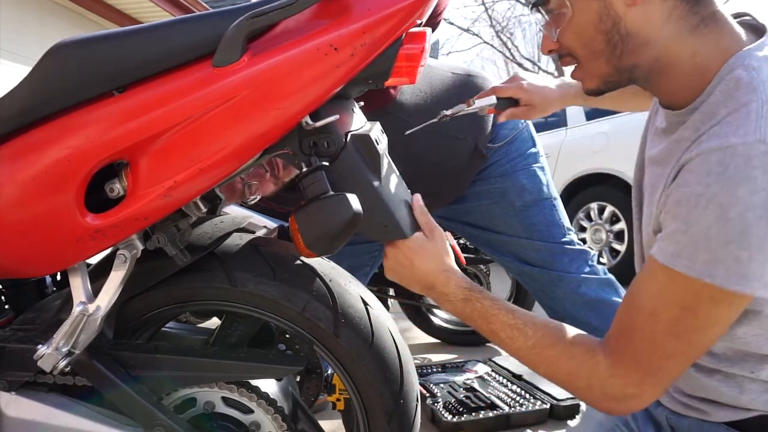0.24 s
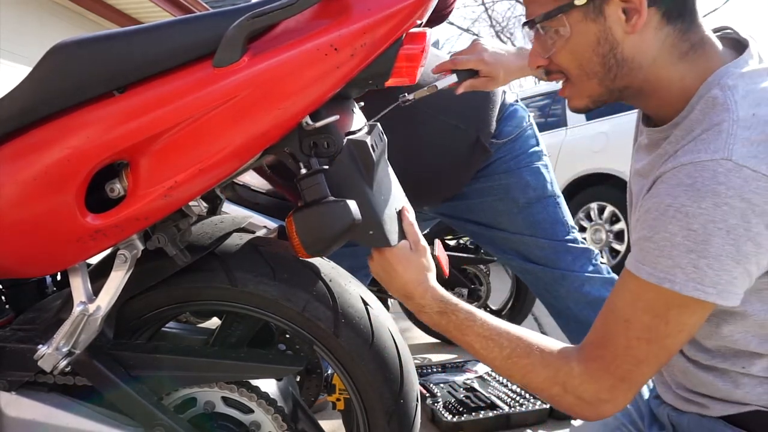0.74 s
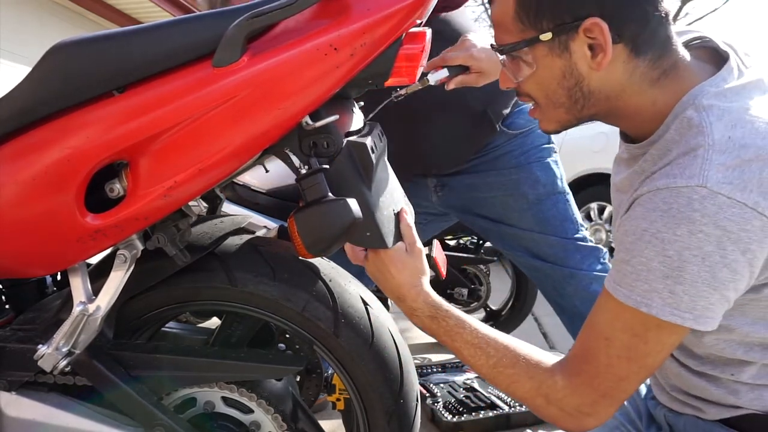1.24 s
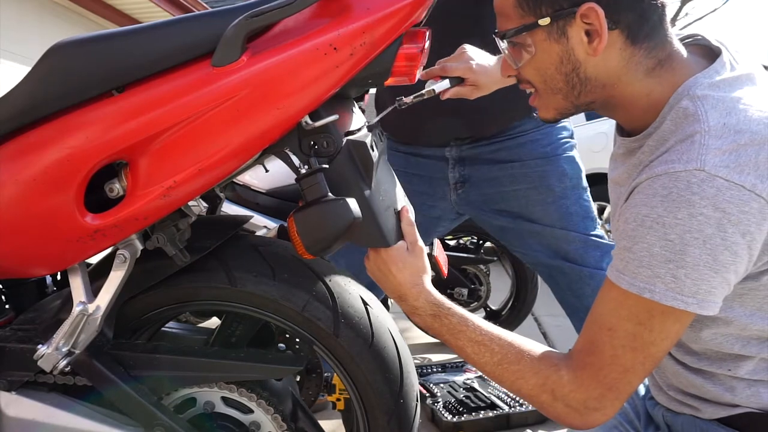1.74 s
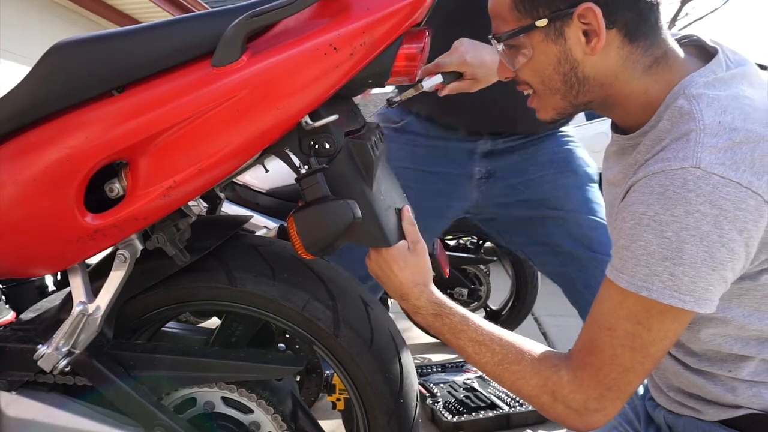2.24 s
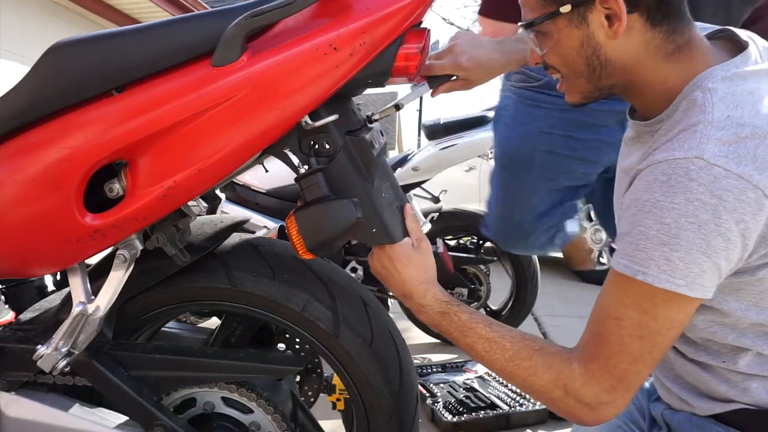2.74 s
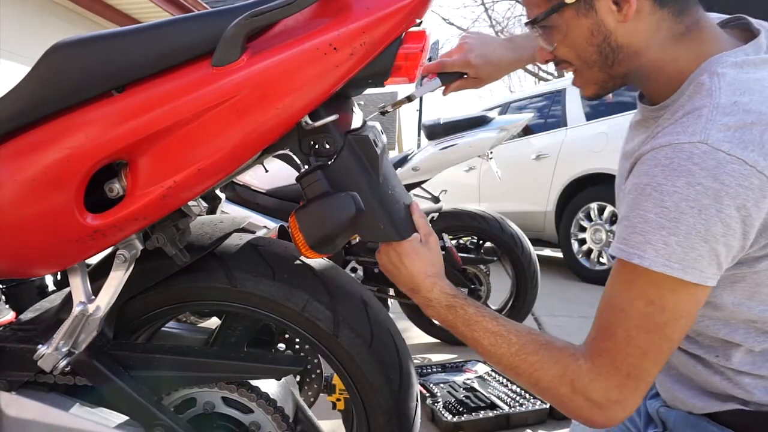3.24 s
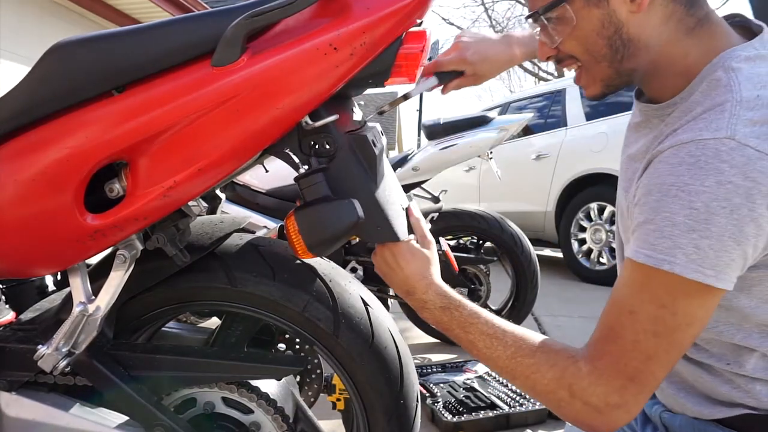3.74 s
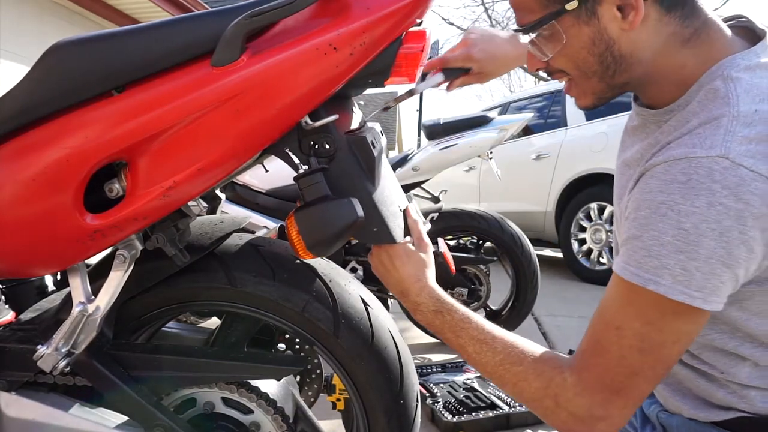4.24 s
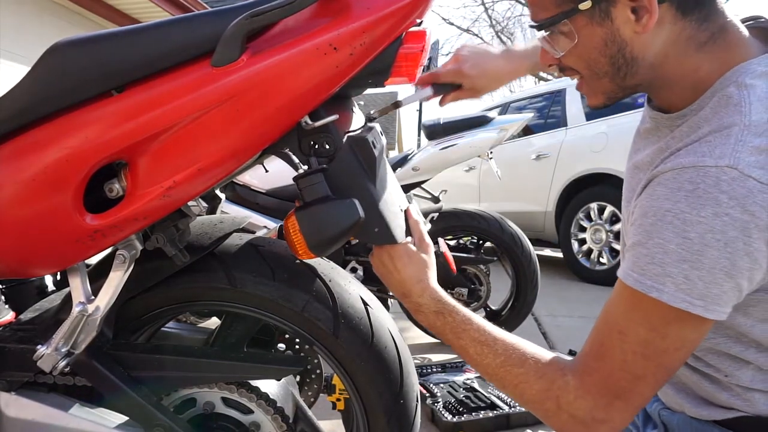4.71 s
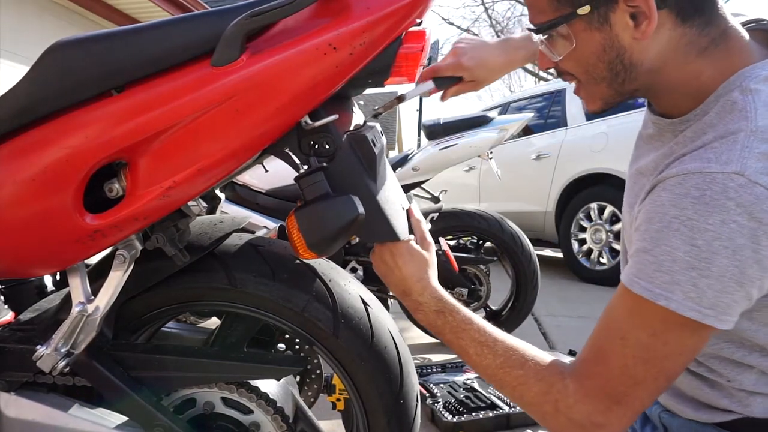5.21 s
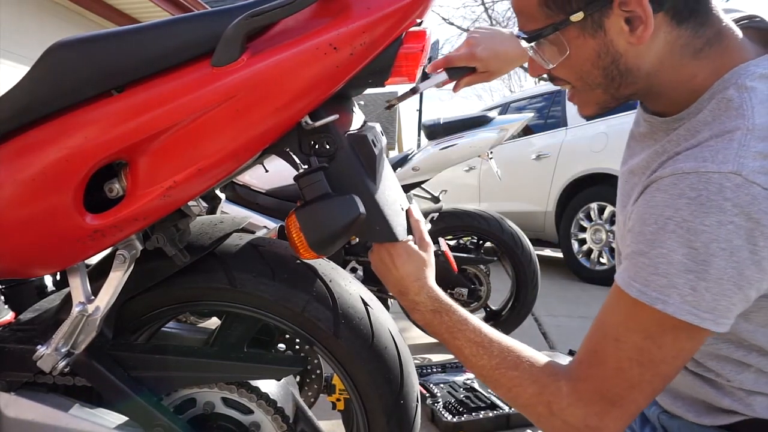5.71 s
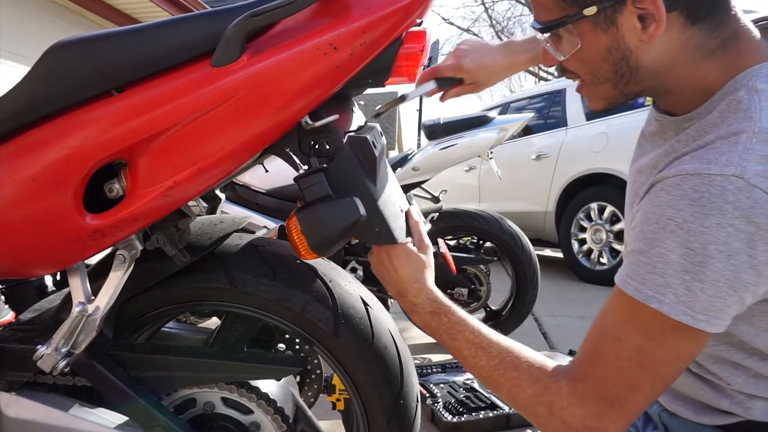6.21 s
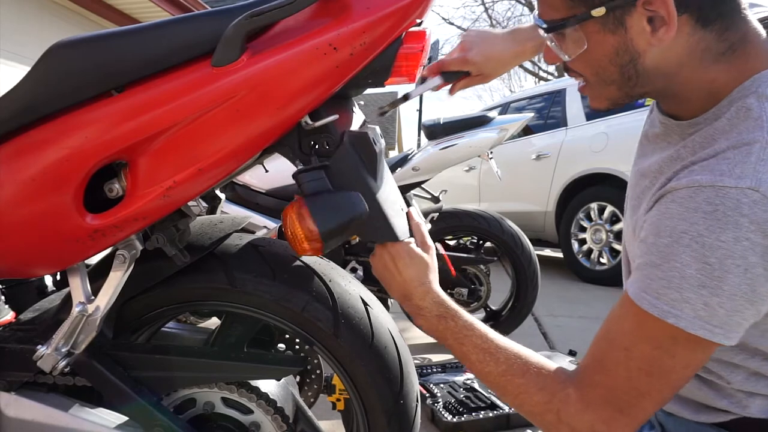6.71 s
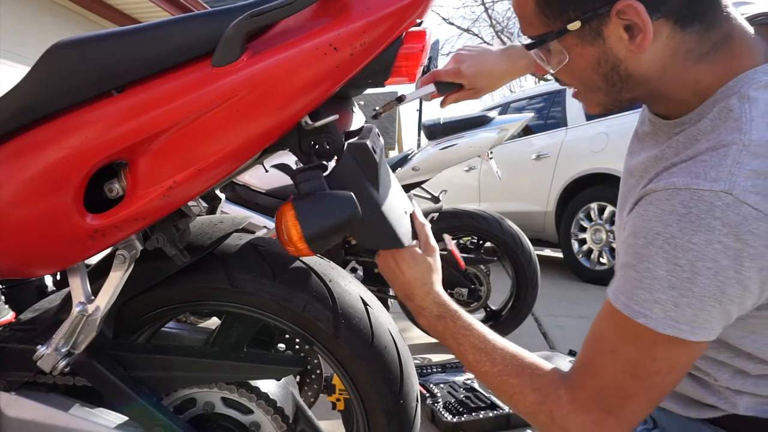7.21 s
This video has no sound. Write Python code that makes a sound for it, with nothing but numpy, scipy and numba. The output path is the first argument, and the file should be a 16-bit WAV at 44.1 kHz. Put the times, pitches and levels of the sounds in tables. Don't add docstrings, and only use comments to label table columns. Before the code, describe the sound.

Wind buffets a close microphone in a driveway while a fine blade is set against thin plastic fins, ticking, snagging and scraping irregularly. Then the hand saws at a brisk, even pace: strong push, weaker pull, nearly five full cycles each second. Each stroke is a short gritty zip ringing the hollow plastic, with bright metallic hiss and occasional tooth clicks. Distant traffic murmurs very quietly beneath, and the strokes continue to the end.

```python
import sys
import numpy as np
from scipy import signal
from scipy.fft import rfft, irfft, next_fast_len
from scipy.io import wavfile
from scipy.ndimage import uniform_filter1d
from numba import njit

SR = 44100
rng = np.random.default_rng(int(sys.argv[2]) if len(sys.argv) > 2 else 0)


def volts_from_db(level):
    exponent = np.asarray(level, float) / 20
    return 10 ** exponent


def persist_wave(psi):
    counts = np.round(np.clip(psi, -1, 1) * 32767).astype(np.int16)
    wavfile.write(sys.argv[1], SR, np.atleast_2d(counts).T)


N = 328985

# (start [s], length [s], body level [dB], fin level [dB], tooth rate [Hz])
PUSH_STROKES = [(3.42, 0.081, -29.5, -37, 423.2), (3.638, .08, -27, -34.5, 400.3),
                (3.838, 0.058, -29, -34, 400.2), (4.037, 0.076, -21.5, -29.5, 476),
                (4.254, 0.063, -20.5, -27, 475), (4.474, 0.063, -21.5, -30, 396),
                (4.698, .068, -22, -28.5, 437), (4.908, 0.077, -21.5, -29, 436.6),
                (5.129, 0.055, -19.5, -30.5, 442.8), (5.338, .08, -20.5, -29, 424),
                (5.56, 0.072, -18.5, -26.5, 403.3), (5.772, 0.07, -21, -29.5, 444.8),
                (5.992, 0.07, -20, -30, 521.4), (6.209, .086, -21.5, -27.5, 419.2),
                (6.417, 0.062, -19.5, -28, 406.9), (6.616, .07, -22.5, -26.5, 408.8),
                (6.808, 0.059, -21.5, -26, 410), (6.993, 0.055, -22, -27.5, 350.4),
                (7.194, 0.063, -27, -28.5, 534), (7.385, 0.059, -23.5, -28, 367.2)]
# (start [s], length [s], body level [dB], fin level [dB], tooth rate [Hz])
PULL_STROKES = [(3.536, 0.07, -34, -43, 371.4), (3.732, 0.089, -32, -38.5, 424),
                (3.943, 0.091, -33.5, -40.5, 399), (4.137, .12, -36, -35, 519),
                (4.376, .07, -39, -41, 423.8), (4.598, 0.058, -36.5, -39.5, 406),
                (4.812, 0.074, -29.5, -34, 465), (5.014, .085, -26.5, -33, 385),
                (5.244, .09, -36, -39, 460.8), (5.46, .11, -28, -35.5, 445.3),
                (5.662, 0.083, -29, -34.5, 382.4), (5.88, 0.1, -31.5, -33, 405.4),
                (6.113, .093, -32.5, -37.5, 444.7), (6.334, 0.069, -30.5, -40.5, 405),
                (6.517, .087, -30.5, -37, 505.5), (6.713, 0.09, -32.5, -40.5, 437.3),
                (6.899, 0.086, -29, -37, 410), (7.091, 0.099, -36, -36.5, 555.3),
                (7.272, 0.097, -30.5, -33.5, 455.2)]
# (start [s], length [s], body level [dB], fin minus body [dB], blade minus body [dB])
TRIAL_SCRAPES = [(.74, .05, -52, -9, -30), (0.879, .05, -61.5, -3, -22), (1.505, 0.088, -42, -9, -25.5),
                 (1.649, 0.033, -44.5, 6, -20), (1.693, 0.055, -60, -19, -22),
                 (1.824, 0.061, -44.5, -3, -15.5), (1.96, .06, -51, -21, -27),
                 (2.063, 0.087, -32.5, -9, -19.5), (2.188, 0.064, -36, -12, -44), (2.34, .05, -60, -4, -9),
                 (2.629, .029, -27.5, -13, -26.5), (2.657, 0.067, -30, -6.5, -19),
                 (2.737, .022, -27.5, -7, -26), (2.777, 0.061, -33, -10.5, -16.5),
                 (2.824, 0.047, -36, -9, -23), (3.302, 0.072, -39.5, -10.5, -30),
                 (3.357, 0.062, -42.5, -8, -18)]
# (time [s], hiss [dB], fin rustle [dB])
BLADE_DRAG = [
    (0., -84, -59),
    (.35, -87, -73),
    (.72, -83, -82),
    (.77, -77, -86),
    (1.4, -76, -72),
    (1.6, -74, -61.5),
    (2.4, -65, -63),
    (2.9, -72.5, -66.5),
    (3.28, -69.5, -60),
]
# (pitch [Hz], width [Hz], level [dB])
BODY_MODES = [(146, 33, -33), (230.4, 106, -14), (347, 86.3, -1), (385, 74.7, 0.5), (442, 85.6, -4.5),
              (555, 70.5, -2), (592.7, 78.4, -5), (724, 109, -13.5)]
# (pitch [Hz], width [Hz], level [dB])
FIN_MODES = [(851, 69, 0), (974, 63, 0.5), (1264, 283, -3.5), (1525, 84, 2.5), (1697, 260, -9),
             (2224, 266, -9), (2558, 304, -12), (3235, 226, -13), (3407, 550, -17.5)]
# (pitch [Hz], width [Hz], level [dB])
OUTER_FIN_MODES = [(710, 110, 4.5), (1080, 180, -3.5), (1820, 250, -4.5), (2150, 210, -5),
                   (2560, 200, -5.5), (4060, 510, -17)]
# (pitch [Hz], width [Hz], level [dB])
BLADE_MODES = [(4428, 380, -10), (5346, 130, 4.5), (5720, 660, 1), (7030, 1200, -9.5), (7417, 160, 2.5),
               (8340, 582, -6.5), (9000, 580, -9), (10030, 381, -4.5), (10640, 172, -6), (10963, 98.8, 5.5)]
# (frequency [Hz], level [dB per Hz])
FRICTION_HISS = [(1200, -29), (2500, 2.5), (4000, 0.5), (7000, -0.5), (11000, -9), (12000, -8)]
# (time [s], peak [dB], ring minus peak [dB])
TOOTH_CATCHES = [(3.4302, -15, -16), (3.642, -17, -8.5), (4.0986, -15, 1), (4.3828, -20, -25),
                 (4.4713, -22, -8), (4.6947, -14.5, -16), (4.7547, -15, 0.5), (4.9183, -24, 5),
                 (4.9758, -20, 4), (5.249, -20.5, -25), (5.427, -25, -1), (5.6266, -27, 2),
                 (5.7744, -27, 6), (6.0033, -17.5, 4.5), (6.2159, -16.5, -11), (6.4215, -19.5, 3.5),
                 (7.002, -19.5, 5.5), (7.412, -14, -10), (7.4514, -38, 4)]
# (time [s], peak [dB], thud minus peak [dB], ring minus peak [dB])
BLADE_TAPS = [(.1244, -44, -2, -23), (.286, -48, 0, -12), (.7529, -32.5, 13.5, -29), (.7744, -42, 17, -20),
              (.8653, -44, 6, -27), (.9036, -38, 4.5, -22), (1.5173, -29, 3.5, -18),
              (1.6574, -27.5, -2.5, -27), (1.714, -30, -4, -31), (1.8442, -25, -8, -22),
              (1.9887, -39.5, 5, -1.5), (2.0534, -30, 1, -16), (2.394, -31, 10, -23), (2.483, -39, -2, -11),
              (2.6382, -34, 9, -22), (2.743, -21.5, 14, -5), (2.9203, -35.5, -3, -37),
              (3.1832, -24.5, 3.5, -31)]
# (time [s], peak [dB], pitch [Hz])
WIND_SLAPS = [(0.017, -24.5, 181), (0.138, -32, 145), (0.231, -26.5, 194), (0.681, -28.5, 101),
              (0.725, -18, 172), (0.776, -22, 132), (0.856, -16.5, 145), (1.022, -20, 194),
              (1.089, -32, 113), (1.118, -21, 110), (1.219, -25.5, 140), (1.36, -31, 52),
              (2.969, -40, 57.1), (3.022, -28.5, 118), (3.089, -30.5, 69.9), (3.708, -24.5, 68),
              (3.878, -23, 256.4), (3.939, -22, 81), (4.059, -29, 91.5)]
# (crest time [s],
# level [dB], dying time [s])
GUSTS_AND_THUMPS = [(0.039, -38.5, 0.022), (.12, -37.5, 0.078), (.56, -54, 0.023), (0.731, -27.5, 0.067),
                    (.87, -46, 0.013), (1.04, -30.5, 0.083), (1.24, -48, .12), (3.03, -47, .08),
                    (3.49, -54, 0.044), (3.72, -40.5, 0.057), (3.82, -39, 0.14), (3.95, -33, 0.045),
                    (4.07, -40.5, .15), (5.36, -57, .04), (5.74, -51, .2), (6.05, -55, 0.052), (6.31, -46, .05),
                    (6.46, -44, .06), (6.69, -47, .03), (6.84, -43, .07), (7.25, -48, .12), (7.42, -47, 0.098)]
# (frequency [Hz], level [dB per Hz])
WIND_SPECTRUM = [(26, -50), (45, 0), (134, 2.5), (352, -9), (493, -28), (595, -45), (666, -55), (727, -35),
                 (900, -55), (1170, -58), (1980, -120)]
# (frequency [Hz], level [dB per Hz])
STREET_SPECTRUM = [(59, -8.5), (100, -6.5), (203, -10.5), (278, -13.5), (473, -8), (564, -11.5),
                   (887, -9.5), (2030, -33.5), (2370, -35.5), (3000, -42), (11000, -48), (14300, -78),
                   (22000, -120)]
# (frequency [Hz], left minus right [dB])
PORT_LEVEL = [(60, 0.0), (110, 0), (190, 1), (350, 1), (630, 2.5), (1120, 3.5), (2020, 7), (3620, 9),
              (6510, 10), (11700, 12)]
# (frequency [Hz], left lead [rad])
PORT_PHASE = [(0, 0.038), (260, -1.165), (950, -1.51), (3010, -1.09), (3960, -1.34), (5000, -0.91),
              (5510, -0.88), (5770, -1.5), (6290, -1.3), (7670, -0.9), (8180, -1.2), (11100, 0.18),
              (11400, -0.6), (11900, -0.2)]


def saw(jitter=0.1, scatter_db=4.5, rasp_db=-8, fin_rasp_db=3.5, chatter_db=1.5, grit_db=6.5, bare_db=-7):
    t = np.arange(N) / SR
    (body, fins, blade, dry), tooth_hz = arm()
    times, hiss_db, rustle_db = np.transpose(BLADE_DRAG)
    drag = volts_from_db(np.interp(t, times, hiss_db) - 1.0)
    rustle = volts_from_db(np.interp(t, times, rustle_db) - 1.0)

    spacing, bite = rng.standard_normal((N // 40, 2)).T
    clicks = teeth(tooth_hz, np.clip(1 + jitter * spacing, 0.4, 2), volts_from_db(scatter_db * bite))
    clicks = level(clicks - clicks.mean(), 0)
    rasp = rng.standard_normal(N) * volts_from_db(2.34 * walk(rate=270.0))
    chip_decay = np.exp(-1 / (0.00024 * SR))
    chips = signal.lfilter([1], [1, -chip_decay], np.maximum(clicks, 0))
    grains = volts_from_db(grit_db * walk(rate=810.0)) * (0.5 + 0.2 * level(chips, 0))
    grit = rng.standard_normal(N) * grains + 0.3 * clicks
    chatter = volts_from_db(chatter_db * walk(rate=88.0))

    body_push = clicks + level(rasp, rasp_db)
    fin_push = clicks + level(rasp, fin_rasp_db)
    on_outer = t < 1.93
    layers = [  # drive, pressure, modes, wander of each mode [dB]
        (body_push, body, BODY_MODES, 2.5),
        (grit, blade, BLADE_MODES, 4.2),
        (fin_push, fins * ~on_outer + rustle, FIN_MODES, 3.6),
        (fin_push, fins * on_outer, OUTER_FIN_MODES, 3.6),
    ]
    rung = 0
    for push, press, modes, shift_db in layers:
        drive = push * chatter
        rung = rung + ring(drive * press, modes, shift_db) / np.std(ring(drive, modes))
    friction = drag + dry + level(grains * chatter, bare_db) * blade
    return rung + coloured(FRICTION_HISS)[0] * friction


def arm(stretch=1.12, sharp=1.69, blade_crest=0.45, blade_sharp=2.33, glide=0.35, tail_s=0.023):
    t = np.arange(N) / SR
    press, hz = np.zeros((4, N)), np.full(N, 400.0)
    for start, length, crest, *db, tooth_hz in bites():
        end = start + stretch * length
        span = slice(int(start * SR), int(end * SR))
        u = np.clip((t[span] - start) / (stretch * length), 0, 1)
        plastic = hump(u, crest) ** sharp
        steel = hump(u, blade_crest) ** blade_sharp
        shapes = np.array([plastic, plastic, steel, steel])
        press[:, span] += volts_from_db(np.array(db) + 2.0)[:, None] * shapes
        hz[span] = tooth_hz * (1 + glide * (u - 0.5))
    fading = linger(press, tail_s)
    rubbing = linger(press, 0.09)
    share = np.array([[0.02], [0.04], [0.16], [0.05]])
    return np.maximum(press, 0.45 * fading) + share * rubbing, hz


def hump(u, crest):
    return (u / crest) ** crest * ((1 - u) / (1 - crest)) ** (1 - crest)


def linger(press, seconds):
    keep = np.exp(-1 / (seconds * SR))
    return signal.lfilter([1 - keep], [1, -keep], press)


def bites():
    rows = []
    for start, length, db, fin, blade in TRIAL_SCRAPES:
        rows.append((start, length, 0.4, db, db + fin, db + blade, db + blade - 8, 410))
    for strokes, crest, blade_db, drift in ((PUSH_STROKES, 0.41, -11.5, 0.04),
                                            (PULL_STROKES, 0.37, -16.5, -4)):
        for start, length, db, fin, hz in strokes:
            blade = fin + blade_db + drift * (start - 4)
            rows.append((start, length, crest, db, fin, blade, -np.inf, hz))
    return sorted(rows)


@njit
def teeth(hz, stretch, size):
    clicks, phase, k = np.zeros(len(hz)), 0.0, 0
    for i in range(len(hz)):
        phase += hz[i] * stretch[k] / SR
        if phase >= 1:
            phase, k = phase - 1, k + 1
            clicks[i] = size[k]
    return clicks


def ticks(crack_s=0.0046, thud_s=0.00082, catch_thud_db=-1.5):
    t = np.arange(2048) / SR
    out = np.zeros(N + len(t))
    rows = BLADE_TAPS + [(s, db, catch_thud_db, ring_db) for s, db, ring_db in TOOTH_CATCHES]
    blows = rng.standard_normal((len(rows), len(t)))
    for (start, db, thud_db, ring_db), blow in zip(rows, blows):
        crack = blow * np.exp(-t / crack_s) * np.minimum(t / 0.00048, 1)
        thud = blow * np.exp(-t / thud_s)
        parts = ring(thud, BODY_MODES), ring(crack, FIN_MODES), ring(crack, BLADE_MODES)
        for part, part_db in zip(parts, (db + thud_db, db, db + ring_db)):
            out[int(start * SR):][:len(t)] += volts_from_db(part_db - 6.5) * part / np.max(np.abs(part))
    return out[:N]


def echoes(x, t60_s=0.046, low_hz=1330.0):
    t = np.arange(4096) / SR
    out = 0
    for path in range(2):
        decay = np.exp(-np.log(1000) * t / t60_s) * (t > 0.002)
        tails = level(rng.standard_normal((2, len(t))) * decay, -39)
        tails = signal.lfilter(*signal.butter(2, low_hz, "high", fs=SR), tails)
        sway = level(np.array([walk(rate=30.0), walk(rate=30.0)]), 0)
        out = out + signal.fftconvolve(x * sway, tails, axes=1)[:, :N]
    return out


def slaps(cycles=1.55):
    t = np.arange(4096) / SR
    out = np.zeros(N + len(t))
    for start, db, hz in WIND_SLAPS:
        swing = np.sin(2 * np.pi * hz * t) * np.exp(-(t * hz / cycles) ** 2)
        out[int(start * SR):][:len(t)] += volts_from_db(db - 5.0) * swing
    return out[:N]


def wind(flutter_db=3.5, apart=0.33, breeze_db=-54.5, rise_s=0.016):
    t = np.arange(N) / SR
    gusts = 0
    for crest, db, dying_s in GUSTS_AND_THUMPS:
        gusts = gusts + volts_from_db(db) * np.exp(np.where(t < crest, (t - crest) / rise_s, (crest - t) / dying_s))
    shared, left, right = coloured(WIND_SPECTRUM, channels=3)
    gain = volts_from_db(flutter_db * walk(rate=30.0)) * (volts_from_db(breeze_db) + gusts)
    return ports(gain * shared) + apart * gain * np.array([left, right])


def far_street():
    return coloured(STREET_SPECTRUM, channels=3) * volts_from_db(-55 + 0.91 * walk(rate=2.65))


def ports(x):
    size = next_fast_len(N + SR)
    hz = np.arange(size // 2 + 1) * SR / size
    lead = np.interp(hz, *np.transpose(PORT_PHASE))
    half = volts_from_db(curve(PORT_LEVEL, hz) / 2) * np.exp(0.5j * lead)
    return irfft(rfft(x, size) * np.array([half, 1 / half]), size)[:, :N]


def ring(x, modes, shift_db=0.0):
    out = 0
    for k, (hz, width, db) in enumerate(modes):
        drive = x * volts_from_db(shift_db * walk(rate=26.0)) if shift_db else x
        mode = signal.lfilter(*signal.iirpeak(hz, hz / width, SR), drive)
        out = out + (-1) ** k * volts_from_db(db) * mode
    return out


def walk(rate):
    k = int(SR / rate)
    held = np.repeat(rng.standard_normal(N // k + 1), k)
    return 0.76 * uniform_filter1d(uniform_filter1d(held, k), k)[:N]


def coloured(table, channels=1):
    size = next_fast_len(N)
    gain = volts_from_db(curve(table, np.arange(size // 2 + 1) * SR / size))
    noise = rng.standard_normal((channels, size))
    return level(irfft(rfft(noise) * gain, size)[:, :N], 0)


def curve(table, hz):
    points = np.array(table)
    return np.interp(np.log(hz + 1), np.log(points[:, 0] + 1), points[:, 1])


def level(x, db):
    return x * volts_from_db(db) / np.sqrt(np.mean(x ** 2))


def scene():
    work = saw() + ticks()
    street = far_street()
    near = ports(work + slaps() + 1.075 * street[0])
    scattered = volts_from_db(-5) * echoes(work)
    return near + scattered + 0.18 * street[1:] + wind()


def top_cut(x):
    return signal.sosfilt(signal.butter(12, 12300, fs=SR, output="sos"), x)


def record(dry):
    low_pass = signal.ellip(10, 0.2, 65, 11100, fs=SR, output="sos")
    cut = signal.sosfilt(low_pass, dry)
    mix = cut - 0.043 * cut ** 3
    return top_cut(mix)


dry = scene()
out = record(dry)
persist_wave(out)
```